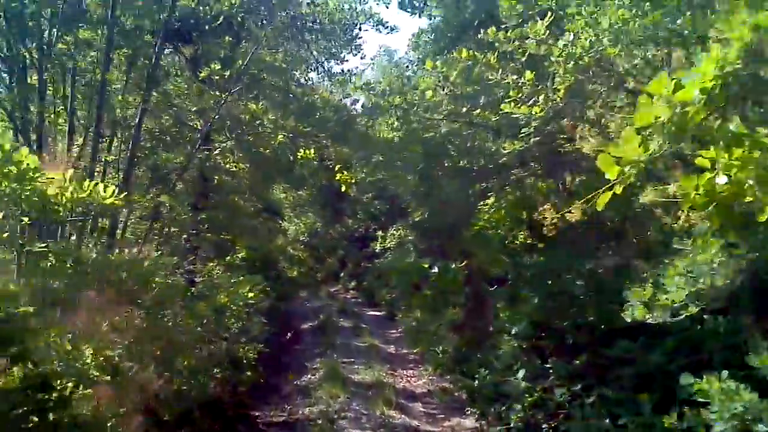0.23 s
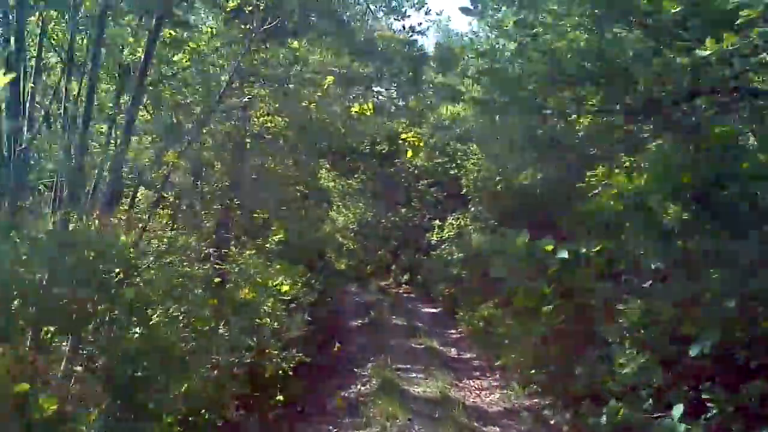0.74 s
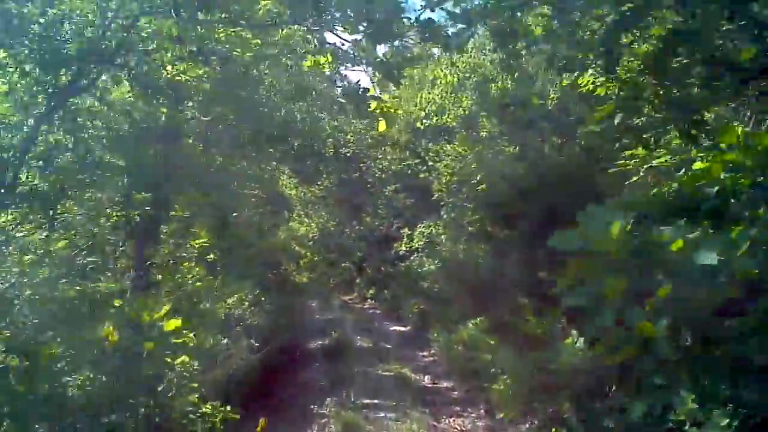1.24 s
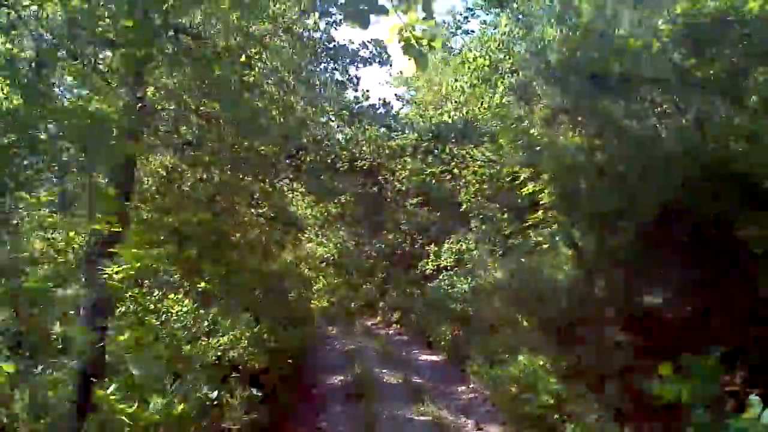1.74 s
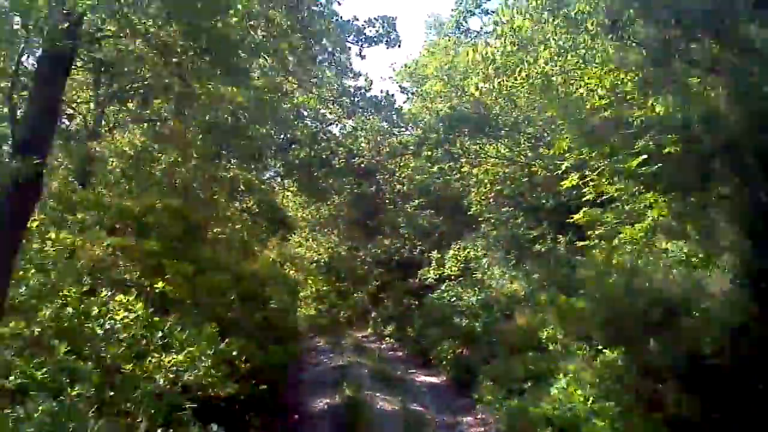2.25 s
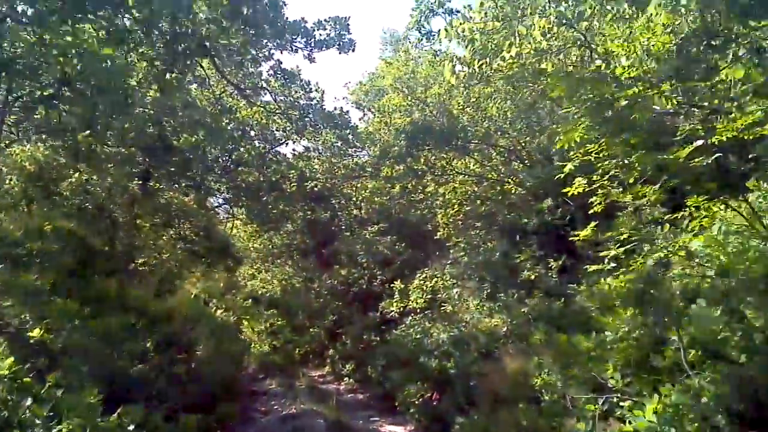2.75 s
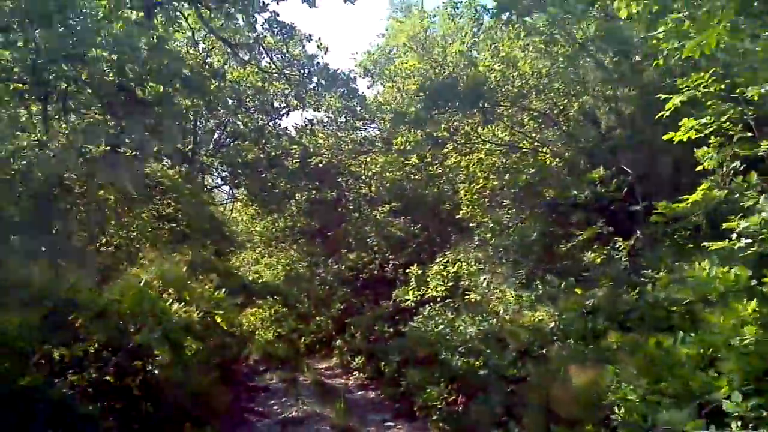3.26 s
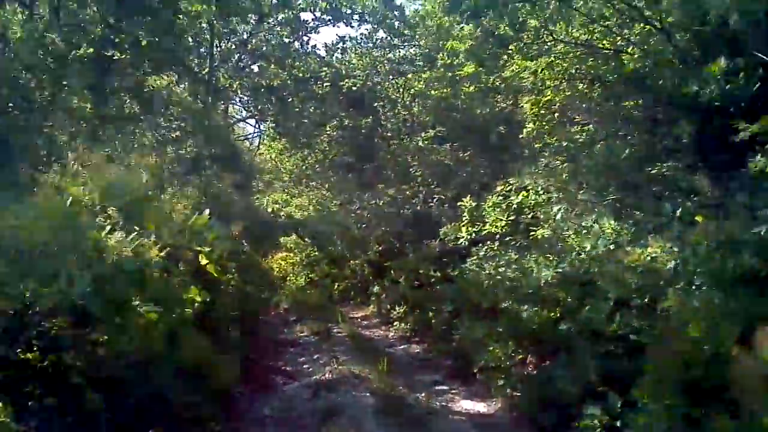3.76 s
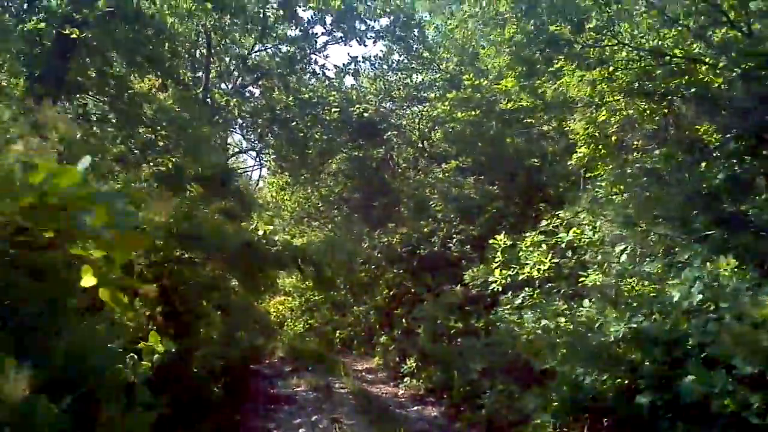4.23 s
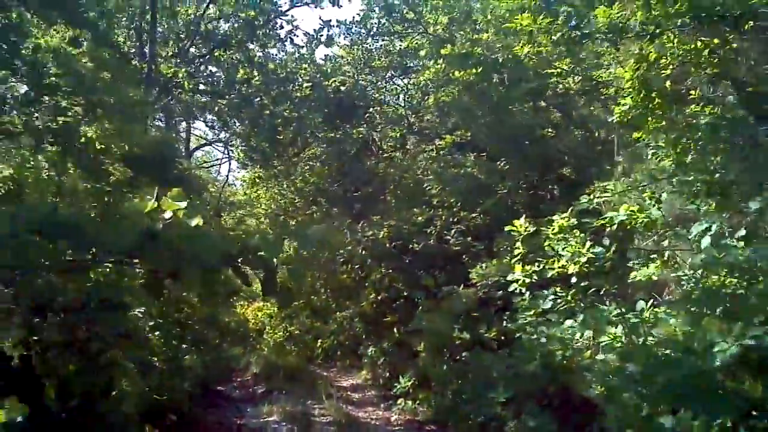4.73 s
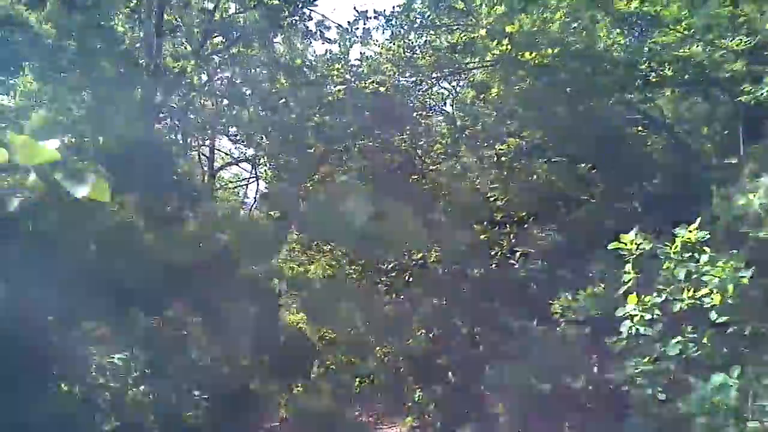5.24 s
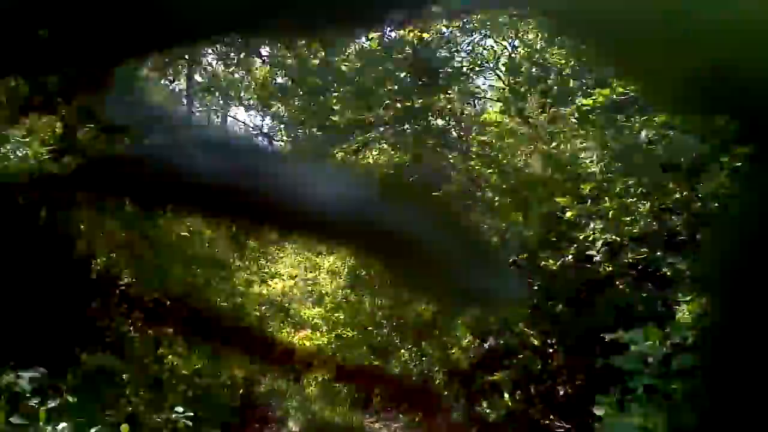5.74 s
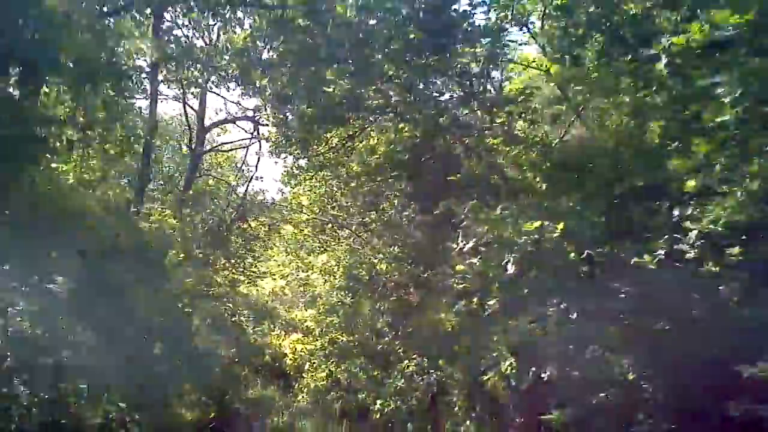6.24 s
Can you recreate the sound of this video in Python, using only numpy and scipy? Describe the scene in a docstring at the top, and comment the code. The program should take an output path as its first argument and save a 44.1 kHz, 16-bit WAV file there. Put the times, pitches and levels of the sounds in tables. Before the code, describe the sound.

An engine drones low and steady on an overgrown track while twigs snap sharply, leaves hiss and branches knock hollowly on body panels.

```python
"""On an overgrown forest track an off-road vehicle crawls along, heard from a small camera on its body.
The engine drones below: wavering tones over noise that swells with every firing.
Leaves hiss and tick along the flanks and stems rumble on the panels: clumped noise puffs and tiny rings.
Twigs snap as short bursts of bright noise; branches knock the panels and shake their modes.
The camera widens its two microphones by subtracting each, slightly late, from the other."""
import sys
import numpy as np
from scipy import signal
from scipy.fft import rfft, irfft, next_fast_len
from scipy.io import wavfile

SR = 44100
rng = np.random.default_rng(int(sys.argv[2]) if len(sys.argv) > 2 else 0)


def wrap_up_sound(samples):
    """Save the sound to the file named by the first command line argument, as 16-bit audio."""
    columns = np.atleast_2d(samples).T
    # keep every value between -1 and 1, then stretch to whole-number steps
    tamed = np.clip(columns, -1, 1)
    steps = np.round(tamed * 32767).astype(np.int16)
    wavfile.write(sys.argv[1], SR, steps)


N = 286209

# All levels are set ahead of the widening.
# Engine loudness as heard, rising slowly, then dipping suddenly after a loud slap near the end:
# (time [s], level [dB])
ENGINE_LEVEL = [(0.0, -37), (0.08, -31), (0.89, -30.5), (1.36, -28.5), (2.39, -33), (2.55, -30),
                (2.85, -30.5), (3.46, -27.5), (3.85, -31), (4.39, -31), (4.7, -30), (5.0, -29.5),
                (5.43, -28), (5.62, -25.5), (5.72, -25.5), (5.84, -27.5), (5.87, -36.5), (5.946, -33),
                (6.49, -34.5)]
# Engine pace: (time [s], working cycles [1/s])
ENGINE_PACE = [(0, 18.5), (.6, 18.3), (1.2, 17.95), (1.8, 17.8), (2.3, 17.6), (3.0, 17.7), (4.0, 17.9),
               (4.4, 17.7), (4.8, 18.2), (5.15, 18.45), (5.35, 17.9), (5.6, 18.05), (5.9, 17.9),
               (6.49, 17.9)]
# Engine tones: (multiple of the working cycle, relative level [dB])
ENGINE_ORDERS = [(5, -6), (7, -8), (9, -6), (10, 0), (13, -6), (14, -4), (15, -11), (17, -4), (18, -4),
                 (19, -2), (20, -2), (21, -8), (23, -12), (29, -14)]
# Strength of each cylinder's firing: one column (level [dB])
CYLINDER_LEVEL = [-4.5, -3.5, -4, -4.5]
# Foliage along the body: (time [s], leaf rustle [dB], drag of stems on the panels [dB])
FOLIAGE = [(0.0, -48, -39), (0.2, -44.5, -36.5), (0.36, -41.5, -36.5), (0.5, -27.5, -31.5),
           (0.57, -36.5, -30.5), (0.89, -40, -34.5), (1.1, -44.5, -34), (1.64, -39.5, -34.5),
           (1.82, -46.5, -35), (2.29, -39.5, -37.5), (2.46, -36.5, -35), (2.75, -44, -35), (3.19, -38, -32),
           (3.37, -37.5, -28.5), (3.6, -39.5, -29), (3.85, -44, -35.5), (4.34, -44.5, -36.5),
           (4.62, -43.5, -34.5), (4.85, -45.5, -36), (5.3, -45, -33.5), (5.64, -42, -31), (5.8, -41, -31),
           (5.85, -39.5, -41), (5.87, -45.5, -41), (6.03, -41.5, -37), (6.184, -39.5, -38),
           (6.49, -44.5, -37.5)]
# Twigs snapping and whipping past:
# (time [s], bright register [dB], dull register re bright [dB], nominal fade to -60 dB [s])
TWIG_SNAPS = [(0.3063, -26.5, -5.5, 0.14), (0.369, -37, -12, 0.06), (0.396, -23.5, -0.5, 0.054),
              (0.453, -22, -5, 0.099), (0.485, -25.5, -6, 0.14), (0.506, -25, 3.5, 0.093),
              (0.545, -25.5, -2, 0.1), (0.5885, -30, -17, 0.078), (0.618, -27.5, -34, 0.084),
              (0.672, -30, 4.5, 0.049), (0.7188, -32, -15, 0.085), (0.762, -24, -10, 0.064),
              (0.844, -16.5, -10, 0.063), (0.8716, -19, -3.5, 0.022), (0.9026, -15.5, -4.5, 0.063),
              (1.022, -30, -9, 0.035), (1.06, -35, -15, 0.04), (1.077, -30.5, -8, 0.11),
              (1.092, -28, -7, 0.13), (1.1256, -29, -5, 0.19), (1.196, -30.5, -5, 0.046),
              (1.224, -33.5, 1.5, 0.049), (1.3325, -28.5, -15, 0.026), (1.37, -36, -14, 0.035),
              (1.407, -30.5, -8, 0.04), (1.523, -25, -6, 0.071), (1.5547, -27.5, -13, 0.051),
              (1.81, -32, 0, 0.15), (2.162, -35, -8, 0.046), (2.261, -37, -10, 0.04),
              (2.294, -24, -43, 0.043), (2.3915, -44, -4, 0.077), (2.466, -25.5, -35, 0.035),
              (2.547, -45, -6, 0.032), (2.5995, -18.5, -10, 0.036), (2.699, -39, 16.5, 0.027),
              (2.923, -20.5, -5, 0.075), (2.9474, -33, 8, 0.041), (2.985, -37, 9.5, 0.079),
              (2.994, -16, -18, 0.027), (3.089, -31, -10, 0.04), (3.1546, -32, 3, 0.06),
              (3.19, -17, -6.5, 0.067), (3.2775, -31, 0, 0.21), (3.323, -27, -3.5, 0.23),
              (3.401, -39, 8.5, 0.045), (3.433, -25.5, -1.5, 0.089), (3.448, -30.5, 6, 0.06),
              (3.461, -30, 8, 0.039), (3.478, -39.5, 8.5, 0.13), (3.537, -25, -3, 0.14),
              (3.5636, -28.5, 2.5, 0.18), (3.663, -27, -5, 0.074), (3.691, -31, -1, 0.18),
              (3.717, -20, -6, 0.051), (3.844, -48, 13, 0.21), (3.9155, -36.5, -31, 0.2),
              (4.075, -35.5, -8, 0.13), (4.3195, -24, -11, 0.042), (4.372, -40, -14, 0.046),
              (4.437, -44, -2, 0.11), (4.503, -35.5, -5, 0.14), (4.518, -34.5, -3, 0.15),
              (4.535, -26, -3.5, 0.075), (4.553, -27, -6, 0.068), (4.682, -27.5, -2.5, 0.12),
              (4.697, -23.5, -8.5, 0.085), (4.752, -34, -11, 0.089), (5.001, -33, -9, 0.037),
              (5.096, -31, -18, 0.045), (5.158, -32.5, -24, 0.055), (5.371, -31.5, -7, 0.067),
              (5.5355, -21, -12.5, 0.04), (5.706, -42, 6, 0.065), (5.729, -35, 2.5, 0.14),
              (5.797, -31, 3.5, 0.08), (5.821, -25, -3, 0.076), (5.827, -14, -4, 0.058),
              (5.8425, -15, -5.5, 0.059), (5.912, -37, -10, 0.034), (5.971, -15.5, -6.5, 0.097),
              (6.0, -21, -7, 0.078), (6.048, -33, -10, 0.051), (6.124, -30, -22, 0.044),
              (6.2, -30, -4, 0.22), (6.213, -26, -5.5, 0.14), (6.2567, -29.5, -20, .075),
              (6.309, -22, -4.5, 0.026), (6.396, -26.5, -9, 0.05), (6.471, -38, 1, 0.04)]
# Swing of the snaps' top register: (time [s], added level [dB])
SNAP_TOP_SWING = [(0, 7), (.7, -4), (1.8, 1), (2.7, -2), (3.5, 1), (4.1, 4), (4.7, -11), (5.4, -5),
                  (5.8, 5.5), (6.49, 1)]
# Branches on the panels, levels ahead of the weighting by pitch:
# (time [s], level [dB], pitch of the struck spot [Hz], hardness [0-1])
BRANCH_KNOCKS = [(0.099, -16, 466, 0), (0.174, -13.5, 1190, 0.15), (0.218, -12.5, 151, 0.06),
                 (0.392, -18.5, 890, 0.03), (0.503, -8, 830, 0), (0.67, -6.5, 1100, 0),
                 (0.759, -20.5, 1300, 0), (0.831, -11, 1000, 0), (0.843, -18, 1000, 0.03),
                 (0.855, -1.5, 928, 0.04), (0.872, -12, 935, 0), (0.902, -17, 382, 0.34),
                 (1.08, -12, 175, 0), (1.467, -15.5, 720, 0.3), (1.492, -10.5, 720, 0.1),
                 (1.519, -12.5, 1020, 0.07), (1.551, -12.5, 1000, 0.08), (1.822, -6.5, 290, 0.05),
                 (1.834, -20, 402, 0.3), (1.878, -21, 770, 0), (1.924, -9.5, 510, 0.3),
                 (1.988, -15, 650, 0), (1.997, -11, 400, 0), (2.011, -15, 480, 0.07), (2.02, -21, 254, 0.1),
                 (2.1, -15.5, 190, 0.1), (2.574, -9, 365, 0), (2.58, -14.5, 370, 0), (2.59, -16.5, 820, 0),
                 (2.602, -15, 323, 0), (2.612, -20, 332, 0), (2.695, -9, 786, 0.05),
                 (2.866, -13, 846, 0.03), (2.984, -10.5, 1010, 0.07), (3.296, -4, 258, 0.08),
                 (3.397, -14, 330, 0.7), (3.459, -6.5, 740, 0.3), (3.474, -6, 430, 0.12),
                 (3.535, -17, 500, 0), (3.565, -14, 302, 0.03), (3.664, -9.5, 1070, 0),
                 (3.711, -10, 940, 0.8), (3.842, -15.5, 1000, 0), (3.879, -12.5, 950, 0.15),
                 (4.068, -15.5, 342, 0.04), (4.235, -17, 1000, 0.04), (4.319, -24, 1310, 0.25),
                 (4.405, -18, 1170, 0), (4.687, -15.5, 299, 0.16), (5.705, -12, 181, 0),
                 (5.736, -11, 297, 0.02), (5.783, -17, 820, 0.16), (5.797, -13, 1180, 0.07),
                 (5.823, -21, 503, 0.3), (5.966, -24, 900, 0.1), (6.209, -17.5, 340, 0.1)]
# Modes of the bodywork: one column (frequency [Hz])
PANEL_MODES = [125, 170, 230, 300, 380, 480, 590, 720, 860, 960, 1130, 1320, 1560, 1850, 2250]
# Colours of the engine roar, the dragging stems, and the leaves and twigs, each with columns
# (frequency [Hz], relative level per Hz [dB], left minus right [dB], left-right likeness [-1 to 1])
ROAR_COLOUR = [(41, -19, 0, 0.88), (70, -12, 9, .95), (92, -4, 0.5, 1), (166.7, 6, 3, 0.99),
               (278, -4.5, 2, 0.5), (342, -3.5, 2.5, 0.4), (500, -9, -1, 0.21), (594, -8.5, 4, 1),
               (1000, -24, -8, 0.21), (2280, -43.5, -2, 0.039)]
DRAG_COLOUR = [(395, 5, 0.5, 0.31), (670, 3.5, 0.39, 0.38), (920, 4, 0.43, 0.57), (1152, 3, 0.49, -0.044),
               (2175, -9, 4.5, -0.41), (2595, -11, 0.5, 0.16), (3660, -101, 0.5, -1.1)]
LEAF_COLOUR = [(1340, -3.5, -5.5, -0.59), (3430, -6.5, -0.5, 0.24), (6010, -10.5, -14, -0.5),
               (6700, 0.5, -14, 0.057), (9260, -2.5, 8, -0.027), (11700, -8, -13, 0.039),
               (12700, -2.5, 13, -0.33), (16400, -6, -2, -0.14)]
# Low sounds come from the right, then from ahead: (time [s], left delay [samples], left level [dB])
LOW_IMAGE = [(0, 4, -1.5), (3.9, 3, -2), (4.1, -0.5, -0.6), (6.49, 1.5, -0.4)]

DULL_DB, DULL_FOLLOWS = -47.5, 1.32   # dull rustle at its mean; it swings more than the bright one
BIGGEST_CONTACT = 2.5   # limit of a chance contact, in spreads
LEAF_CYCLES = 55   # nominal ring of a ticking leaf, in cycles
SNAP_RISE_S, SNAP_HOLD = 0.0017, 0.024   # a snap swells, holds for this share of its fade, then dies
SNAP_ENDS = 1.046   # over 1: the fade steepens toward a dry end
CRACK_DB, CRACK_S = -0.5, 0.00066   # the break that opens a snap: strength re the snap, fading time
SNAP_TOP_DB, TOP_GAINS = -13.5, 0.08   # top register re bright at the hardest snap; dB gained per dB
RING_T60_S, RING_FALLS = 0.04, 0.35   # ring of a 500 Hz spot; higher spots ring shorter by this power
SPOT_OCTAVES, SPOT_WIDENS = 0.24, 0.25   # reach of a 500 Hz blow; deep blows reach wider by this power
CONTACT_S = 0.0084   # fading time of the rattle of a branch on the panel
# the first blow: delay [s], half length [cycles of the struck spot], strength at 500 Hz [dB]
BLOW_S, BLOW_CYCLES, BLOW_DB = 0.00208, 1.035, -14
WIDEN_LAG = 15   # samples
CUTOFF_HZ = 16600


def from_db(db):
    """Decibels become an amplitude factor."""
    return 10 ** (np.asarray(db) / 20)


def rms_one(x):
    """Scale x to rms 1."""
    return x / np.sqrt(np.mean(x ** 2) + 1e-20)


def in_time(rows):
    """Table columns as curves, one value a sample."""
    s, *columns = np.transpose(rows)
    return [np.interp(np.arange(N) / SR, s, c) for c in columns]


def drift(rate_hz):
    """Random wander of spread 1: coarse noise through a double one-pole low-pass."""
    step = 40   # samples between the coarse points
    r = np.exp(-2 * np.pi * rate_hz * step / SR)
    noise = rng.standard_normal(N // step + 2002)
    slow = signal.lfilter([1], [1, -2 * r, r * r], noise)[2000:]   # skip the settling
    return np.interp(np.arange(N) / step, np.arange(len(slow)), rms_one(slow))


def coloured(pair, colour):
    """Two unrelated signals become left and right with a table's colour, balance and likeness; rms 1."""
    size = next_fast_len(N)
    log_hz = np.log(np.arange(size // 2 + 1) * SR / size + 1)
    points, *columns = np.transpose(colour)
    level_db, left_db, alike = (np.interp(log_hz, np.log(points), c) for c in columns)
    level_db = level_db - 6 * np.maximum(np.log(points[0]) - log_hz, 0)   # falls under the lowest point
    alike = np.clip(alike, -1, 1)
    mid, side = rfft(pair, size) * [np.sqrt(1 + alike), np.sqrt(1 - alike)]
    left = (mid + side) * from_db(level_db + left_db / 2)
    right = (mid - side) * from_db(level_db - left_db / 2)
    return rms_one(irfft([left, right], size)[:, :N])


def band(x, low_hz, high_hz):
    """A band of x, rms 1."""
    sos = signal.butter(2, [low_hz, high_hz], "band", fs=SR, output="sos")
    return rms_one(signal.sosfilt(sos, x))


def engine():
    """Orders of the working cycle as wavering tones, over a roar that swells with every firing."""
    (cycles_per_s,), (level_db,) = in_time(ENGINE_PACE), in_time(ENGINE_LEVEL)
    cycle = np.cumsum(cycles_per_s) / SR
    tones = np.zeros(N)
    for order, db in ENGINE_ORDERS:
        strength = from_db(db + 3.5 * drift(4))
        tones += strength * np.sin(2 * np.pi * order * cycle + 0.9 * drift(4))
    hum = from_db(0.5) * rms_one(tones) * from_db([[1.2], [-1.2]])   # leans left
    cylinders = len(CYLINDER_LEVEL)
    firing = cylinders * cycle
    puff = from_db(CYLINDER_LEVEL)[firing.astype(int) % cylinders] * np.exp(-1.5 * (firing % 1))
    roar = coloured(rng.standard_normal((2, N)) * (0.51 + puff), ROAR_COLOUR) * from_db(1.6 * drift(15))
    return from_db(level_db) * (roar + hum)


def contact_sizes(per_s, clump_db, clump_hz, spread_db):
    """Clumped random contacts as impulses of uneven size."""
    born = rng.random(N) < per_s * from_db(clump_db * drift(clump_hz)) / SR
    return born * from_db(spread_db * np.minimum(rng.exponential(1, N), BIGGEST_CONTACT))


def scratches(per_s, spread_db, smooth):
    """Rubbing: each contact gives a short puff of noise, on a smooth bed."""
    fade = np.exp(-1 / (0.0069 * SR))   # 6.9 ms
    puffs = rms_one(signal.lfilter([1], [1, -fade], contact_sizes(per_s, 5, 12, spread_db)))
    return rng.standard_normal((2, N)) * (smooth + puffs)


def ticks(per_s, low_hz, high_hz, cycles, count=24):
    """Dry leaves and bark tick at random, each ringing a few cycles at its own pitch and side; rms 1."""
    sizes = contact_sizes(per_s, 6, 10, 7.6)
    out, dealt = np.zeros((2, N)), rng.integers(0, count, N)
    for k, hz in enumerate(np.geomspace(low_hz, high_hz, count)):
        r, w = from_db(-60 * hz / (cycles * SR)), 2 * np.pi * hz / SR
        struck = sizes * (dealt == k) + 1e-18
        # two-pole resonator; pitches alternate between left and right
        out[k % 2] += signal.lfilter([0, np.sin(w)], [1, -2 * r * np.cos(w), r * r], struck)
    return rms_one(out)


def brush():
    """Leaves hiss and tick along the flanks while thicker stems rumble on the panels."""
    bright_db, drag_db = in_time(FOLIAGE)
    dull_db = DULL_DB + DULL_FOLLOWS * (bright_db - bright_db.mean())
    hiss = scratches(per_s=130, spread_db=10, smooth=2.5) * from_db(-2.5)
    dense_ticks = ticks(900, 2075, 16500, cycles=LEAF_CYCLES) * from_db(-3)
    dry_ticks = ticks(400, 2300, 14300, cycles=20) * from_db(-10)
    rustle = coloured(hiss + dense_ticks + dry_ticks, LEAF_COLOUR)
    press_db = 1.8 * drift(14)   # the foliage presses unevenly, on all layers at once
    bright = from_db(bright_db + press_db) * band(rustle, 4490, 10950)
    dull = from_db(dull_db + press_db + 1.24 * drift(1.8)) * band(rustle, 2540, 5700)
    stems = coloured(scratches(per_s=84, spread_db=2.5, smooth=2.22), DRAG_COLOUR)
    return bright + dull, from_db(drag_db + 0.16 * press_db) * stems


def snaps():
    """Each twig cracks, then a burst of bright noise dies fast, with its own balance of dull and bright."""
    noise = coloured(rng.standard_normal((2, N)), LEAF_COLOUR)
    registers = [band(noise, 5800, 10800), band(noise, 2000, 5800), band(noise, 10800, 15000)]
    power, t = np.zeros((3, N + SR)), np.arange(SR // 4) / SR
    loudest_db = max(row[1] for row in TWIG_SNAPS)
    for s, db, low_db, t60 in TWIG_SNAPS:
        top_jitter_db = 2 * rng.standard_normal()   # the top varies at random from snap to snap
        fade = from_db(-60 * np.maximum(t / t60 - SNAP_HOLD, 0) ** SNAP_ENDS)
        burst = (1 - np.exp(-t / SNAP_RISE_S)) * fade
        shape = np.hypot(burst, from_db(CRACK_DB) * np.exp(-t / CRACK_S))
        # harder snaps are brighter
        top_db = SNAP_TOP_DB + TOP_GAINS * (db - loudest_db) + top_jitter_db
        levels = from_db([db, db + low_db, db + top_db])[:, None]
        at = round(s * SR)
        power[:, at:at + len(t)] += (levels * shape) ** 2   # overlapping snaps add in power
    power[2, :N] *= from_db(in_time(SNAP_TOP_SWING)[0]) ** 2
    out = np.zeros((2, N))
    for p, register in zip(power, registers):
        out += np.sqrt(p[:N]) * register * from_db(1.5 * drift(300))   # fibres tear unevenly
    return out


def knocks():
    """A firm blow and a short rattle shake the panel modes near the struck spot; hard blows wake higher ones."""
    out, t = np.zeros((2, N + SR)), np.arange(SR // 5) / SR
    modes, during = np.array(PANEL_MODES)[:, None], t[:SR // 25]
    for s, db, hz, hard in BRANCH_KNOCKS:
        shared, own = rng.standard_normal((2, len(PANEL_MODES), len(during)))
        t60 = RING_T60_S * (500 / hz) ** RING_FALLS
        reach = SPOT_OCTAVES * (500 / hz) ** SPOT_WIDENS
        near = np.exp(-0.5 * (np.log2(modes / hz) / reach) ** 2) + hard * 2.33 * (modes > hz)
        decay = from_db(-60 * t * np.sqrt(modes / hz) / t60)   # high modes die sooner
        rings = near * np.sin(2 * np.pi * modes * t) * decay
        bend_s = 0.003 + 0.26 / hz   # a heavy branch bends longer before it bites
        touch = np.exp(-during / CONTACT_S) * np.minimum(during / bend_s, 1) ** 2
        since = (during - BLOW_S) * hz - BLOW_CYCLES   # in cycles of the struck spot
        pulse = np.exp(-(since / BLOW_CYCLES) ** 2 * 3) * np.cos(2 * np.pi * since)
        # the blow lands squarely on the nearest modes
        blow = from_db(BLOW_DB) * pulse * np.sqrt(hz / 500) * near ** 0.57
        left_push = blow + shared * touch
        right_push = 0.76 * blow + (0.42 * shared + 0.5 * own) * touch
        left = signal.fftconvolve(rings, left_push, axes=1).sum(0)
        right = signal.fftconvolve(rings, right_push, axes=1).sum(0)
        peak = np.abs(0.69 * (left + right)).max()
        # deep blows are made stronger, since the widening thins low sounds
        gain = from_db(db) * np.sqrt(500 / hz) / peak
        at = round(s * SR)
        out[:, at:at + len(left)] += gain * np.array([left, right * from_db(-3.5)])
    return signal.sosfilt(signal.butter(2, 110, "high", fs=SR, output="sos"), out[:, :N])


def scene():
    """All sources as the two microphones hear them."""
    leaves, drag = brush()
    left, right = engine() + drag + knocks()
    late, left_db = in_time(LOW_IMAGE)
    left = from_db(left_db) * np.interp(np.arange(N) - late, np.arange(N), left)
    return np.array([left, right]) + leaves + snaps()


def record(dry):
    """Each side loses a late copy of the other, which widens the image; then the top is cut."""
    late = np.pad(dry[::-1], ((0, 0), (WIDEN_LAG, 0)))[:, :N]
    wide = dry - late
    return signal.sosfilt(signal.cheby2(20, 70, CUTOFF_HZ, fs=SR, output="sos"), wide)


dry = scene()
out = record(dry)
wrap_up_sound(out)
```